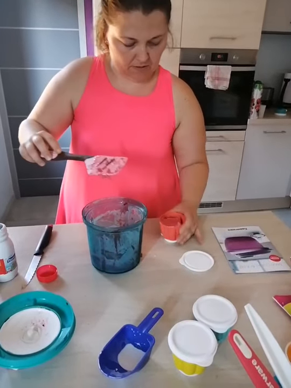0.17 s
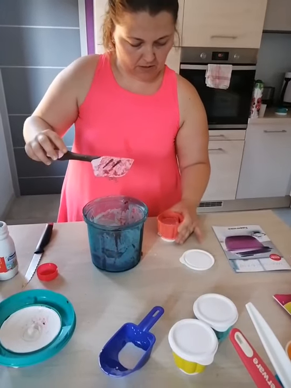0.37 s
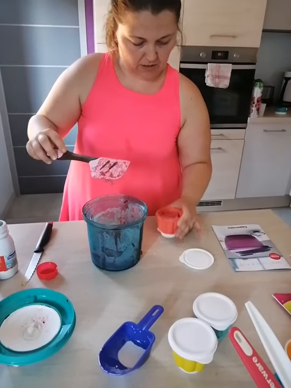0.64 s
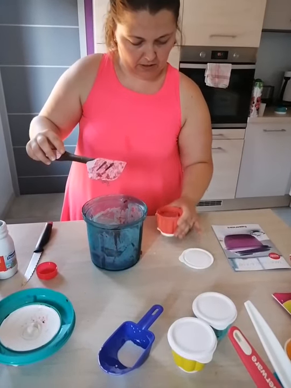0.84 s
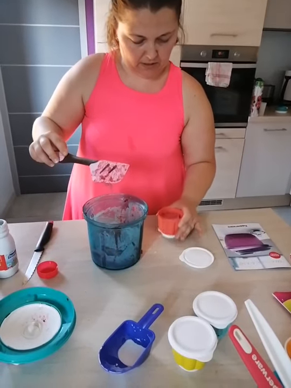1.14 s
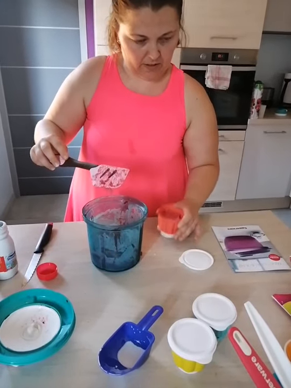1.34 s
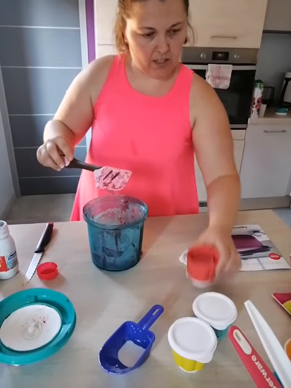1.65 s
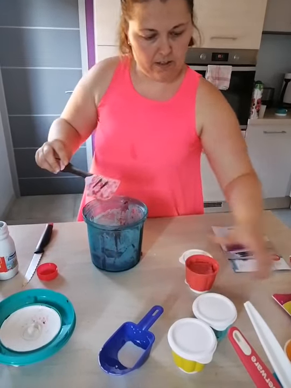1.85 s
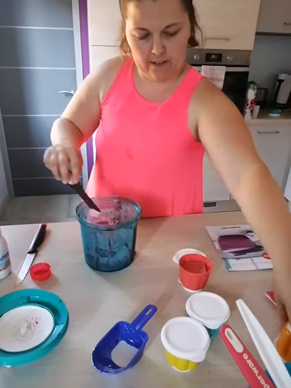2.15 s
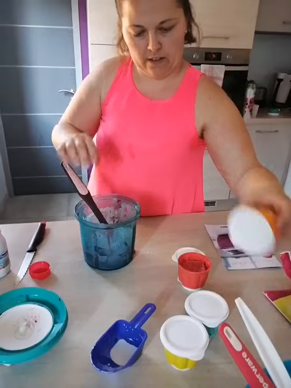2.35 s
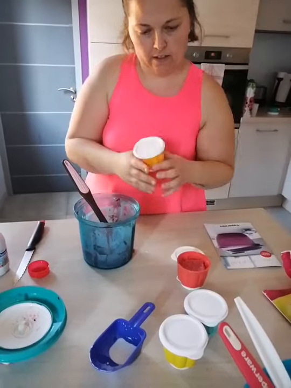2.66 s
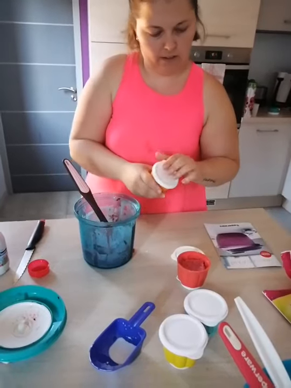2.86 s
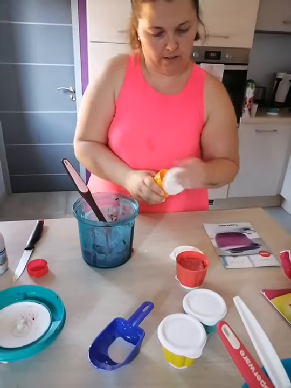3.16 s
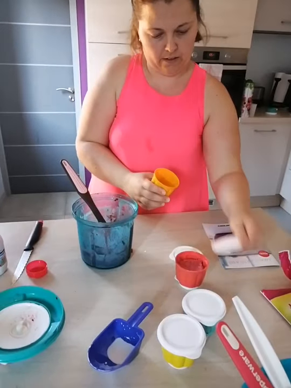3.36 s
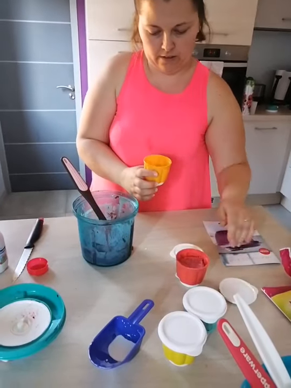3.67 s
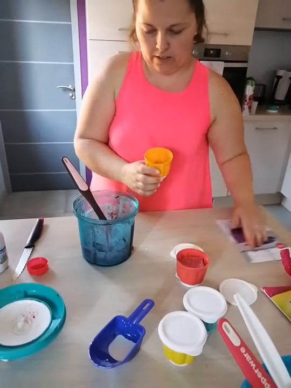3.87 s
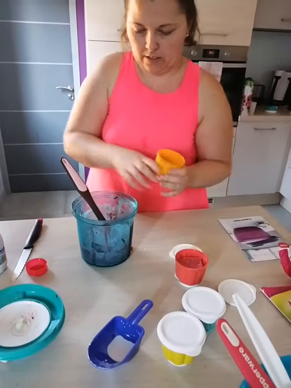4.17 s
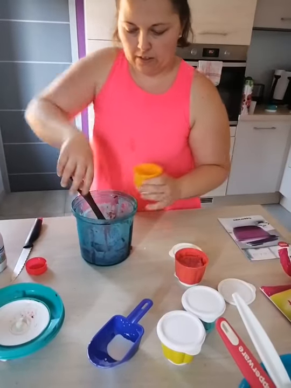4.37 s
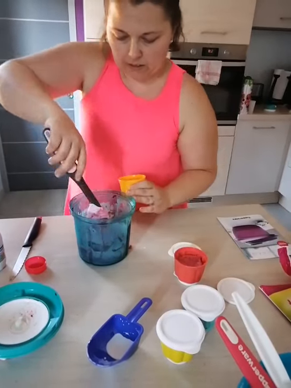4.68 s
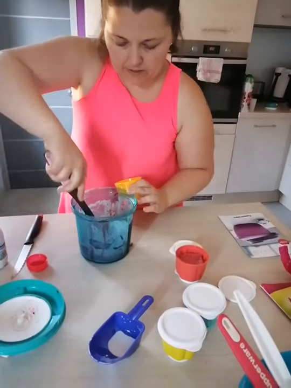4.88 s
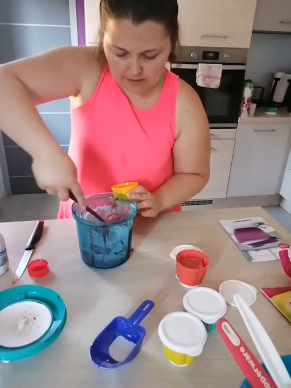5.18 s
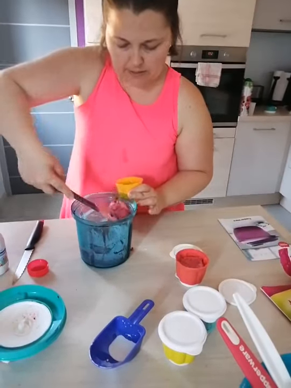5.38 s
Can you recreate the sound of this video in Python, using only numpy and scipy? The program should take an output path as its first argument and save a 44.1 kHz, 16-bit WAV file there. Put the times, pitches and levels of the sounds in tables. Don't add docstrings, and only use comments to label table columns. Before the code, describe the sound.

Seven loud hollow plastic knocks on a kitchen worktop, a soft set-down, spatula clunk, lid pop and clatter, then faint scraping in a jug.

```python
import sys
import numpy as np
from scipy import signal
from scipy.fft import rfft, irfft, next_fast_len
from scipy.io import wavfile
from scipy.ndimage import map_coordinates

SR = 44100
rng = np.random.default_rng(int(sys.argv[2]) if len(sys.argv) > 2 else 0)


def unload_wav(signal):
    wavfile.write(
        sys.argv[1],
        SR,
        np.round(np.clip(np.atleast_2d(signal).T, -1, 1) * 32767).astype(np.int16),
    )


def volts_from_db(level):
    exponent = np.asarray(level, float) / 20
    return 10 ** exponent


N = 243340
SPAN = 2 ** 15

# frequency in Hz, width in Hz, level in dB.
WORKTOP_MODES = [(49.7, 20, -7), (131.9, 9.3, 6), (142.2, 13, 3), (212.7, 13, 4), (253.8, 11, 5),
                 (307.8, 26, 1), (250, 17, -3.5), (352, 24, -3.5), (423.7, 25, -0.5), (543.7, 46, -3)]
# frequency in Hz, width in Hz, level in dB.
JUG_MODES = [(574.4, 74, -1), (1464, 170, -5.5), (1777, 79, -0.5), (2154, 235, -1.5), (2410, 660, -8.5),
             (3220, 680, -18.5), (5400, 2200, -29.5)]
# start in seconds, length in seconds, rasp in dB,
# rumble over rasp in dB, hollow resonance in Hz.
STROKES = [(0.0, 0.29, -74, 4, 2800), (1.565, 0.51, -68, -2, 3170), (2.53, 0.39, -70, 0.5, 3320),
           (2.933, 0.021, -69.5, 13.5, 2830), (2.993, 0.09, -61.5, -9, 2910), (3.113, 0.077, -71, 5, 2800),
           (3.838, 0.066, -67, 5, 8070), (4.135, 0.213, -66, -1, 3320), (4.552, 0.043, -69, 3, 3566),
           (4.807, 0.115, -61, -6, 3400), (4.944, 0.18, -60, 3, 2600), (5.12, 0.06, -62, -5, 3200),
           (5.186, 0.16, -61.5, 0.5, 2470), (5.354, 0.088, -75, -6, 2500)]


def along(points, hz):
    f, v = np.transpose(points)
    return np.interp(np.log(hz + 1), np.log(f + 1), v)


def unit(x):
    return x / np.sqrt(np.mean(x ** 2) + 1e-20)


def filtered(x, response):
    m = next_fast_len(x.shape[-1] + 8192)
    spectrum = rfft(x, m) * response(np.fft.rfftfreq(m, 1 / SR))
    return irfft(spectrum, m)[..., :x.shape[-1]]


def wobble(rate):
    knots = rng.standard_normal(int(N * rate / SR) + 4)
    return map_coordinates(knots, [np.arange(N) * rate / SR])


def hush():
    # frequency in Hz, density in dB per Hz.
    spectrum = [(12, -51.5), (25, 6.5), (52, 7), (90, -2.5), (200, -2.5), (420, -14.5), (493, -2),
                (570, -11.5), (1200, -17.5), (2100, -20.5), (4000, -29), (8000, -37), (12000, -43),
                (15500, -42.5)]
    # time in seconds, level in dB.
    course = [(0, -54.5), (0.222, -57), (1.6, -61.5), (2.8, -62), (3.4, -63), (4.1, -62.5), (4.45, -64),
              (4.8, -60.5), (5.52, -61.5)]
    s, db = np.transpose(course)
    noise = unit(filtered(rng.standard_normal(N), lambda hz: volts_from_db(along(spectrum, hz))))
    return volts_from_db(np.interp(np.arange(N) / SR, s, db) + 1.4 * wobble(6)) * noise


def kitchen():
    # frequency in Hz, time to fall 60 dB in seconds.
    decay = [(60, 0.15), (250, 0.54), (1000, 0.7), (3000, 0.7), (6000, 0.6), (12000, 0.35)]
    hz, t, z = signal.stft(rng.standard_normal(SPAN), SR, nperseg=256)
    fading = z * volts_from_db(-60 * t / along(decay, hz)[:, None])
    tail = signal.istft(fading, SR, nperseg=256)[1][:SPAN]
    tail = tail * np.clip((np.arange(SPAN) / SR - .008) / 0.011, 0, 1)
    tail = filtered(tail, lambda f: (1j * f / (170 + 1j * f)) ** 2)
    return tail / np.linalg.norm(tail)


def ringing(force, modes, gains_db):
    def body(f):
        response = 0
        for k, ((centre, width, db), gain_db) in enumerate(zip(modes, gains_db)):
            damping = 1j * f * width
            response = response + (-1) ** k * volts_from_db(db + gain_db) * damping / (centre ** 2 - f ** 2 + damping)
        return response
    ring = filtered(force, body)
    return ring / np.abs(ring).max()


def singing(rows, waver, rough_db):
    s, hz, db = np.transpose(rows)
    t = np.arange(N) / SR
    turns = np.cumsum(np.interp(t, s, hz) * (1 + waver * wobble(120))) / SR
    level_db = np.interp(t, s, db, -120, -120) + rough_db * wobble(180)
    tone = np.sin(2 * np.pi * turns) * volts_from_db(level_db)
    return tone + volts_from_db(-5) * signal.fftconvolve(tone, kitchen())[:N]


def squeals():
    # start in seconds, length in seconds, first frequency in Hz, last frequency in Hz, level in dB.
    slides = [
        (4.3, 0.09, 5900, 5870, -84),
        (5.04, 0.04, 1510, 1500, -71),
        (5.22, 0.07, 1500, 1495, -67),
        (5.21, 0.19, 2050, 2380, -67.5),
    ]
    swell_s, faint_db = .03, 15
    total = 0
    for s, length, first, last, db in slides:
        end = s + length
        glide = [(s - swell_s, first, db - faint_db), (s, first, db),
                 (end, last, db), (end + swell_s, last, db - faint_db)]
        total = total + singing(glide, waver=.03, rough_db=4.5)
    return total


def strokes():
    bite_s, let_go_s, ease_db_per_s = .012, .015, 25.5
    start, length, rasp_db = np.transpose(STROKES)[:3, :, None]
    since = np.arange(0, N + 32, 32) / SR - start
    bite = np.clip(since / bite_s, 0, 1)
    release = np.clip((length - since) / let_go_s + 1, 0, 1)
    return bite * release * volts_from_db(rasp_db - ease_db_per_s * np.clip(since, 0, 1)), since


def rubbing():
    # frequency in Hz, density in dB per Hz.
    rasp_spectrum = [(530, -53), (900, -18), (1350, -17.5), (1470, -7.5), (1670, -5.5), (2200, -2),
                     (2540, -10.5), (7490, -18.5), (8240, -31.5), (10700, -22.5), (15500, -35.5)]
    pressure, since = strokes()
    start, _, _, rumble_db, hollow_hz = np.transpose(STROKES)
    share = volts_from_db(-42 * np.clip(since, 0, 1))
    grains = rng.standard_normal((3, N)) * volts_from_db(2.8 * wobble(45) + 1.1 * wobble(400))
    hiss = unit(filtered(grains[0], lambda hz: volts_from_db(along(rasp_spectrum, hz))))

    hz, t, z = signal.stft(grains[1], SR, nperseg=512)
    current = np.maximum(np.searchsorted(start, t) - 1, 0)
    detune = (hz[:, None] / hollow_hz[current] - 1) / .13
    hollow = unit(signal.istft(z / (1 + detune ** 2), SR, nperseg=512)[1][:N])

    def full(slow):
        return np.interp(np.arange(N), 32 * np.arange(len(slow)), slow)

    edge = pressure / np.sqrt(1 + share ** 2)
    rasp = full(edge.sum(0)) * hiss + full((edge * share).sum(0)) * hollow
    plate = unit(ringing(grains[2], WORKTOP_MODES, np.zeros(len(WORKTOP_MODES))))
    wall = unit(ringing(grains[2], JUG_MODES[:1], [0]))
    rumble = unit(plate + 0.7 * wall)
    near = rasp + full(volts_from_db(rumble_db) @ pressure) * volts_from_db(3 * wobble(18)) * rumble
    return near + volts_from_db(-8.0) * signal.fftconvolve(near, kitchen())[:N]


def contacts(events, modes, soft_s, rattle, rattle_t60, slap_db, sub_db, deep_db, room_db):
    # frequency in Hz, width in Hz, level in dB.
    click_modes = [(3000, 3300, 3), (6360, 12000, -6)]
    out = np.zeros(N + SPAN)
    t = np.arange(SPAN // 2) / SR
    octaves = np.log2(np.transpose(modes)[0] / 1000)
    place_db = [sub_db, deep_db, deep_db] + [0] * len(WORKTOP_MODES[3:])
    push = -t / soft_s * np.exp(1 - t / soft_s)
    slap = -volts_from_db(slap_db) * np.sin(t / soft_s / 0.99) * np.exp(1 - t / soft_s / 1.7)
    walls = kitchen()
    for s, db, thump_db, click_db, tilt_db in events:
        bounces = rattle * volts_from_db(-60 * t / rattle_t60) * rng.standard_normal(len(t))
        chatter = np.convolve(bounces, push[:64])[:len(t)]
        gains_db = (tilt_db + 5.5) * octaves + 1.8 * rng.standard_normal(len(modes))
        grit_decay = volts_from_db(-60 * t / 0.0055) + 2.2 * volts_from_db(-60 * t / 0.061)
        grit = ringing(rng.standard_normal(len(t)) * grit_decay, click_modes, [0, 0])
        plate_db = place_db + 0.72 * rng.standard_normal(len(WORKTOP_MODES))
        thump = volts_from_db(thump_db + 6) * ringing(push, WORKTOP_MODES, plate_db)

        direct = ringing(push + chatter, modes, gains_db) + volts_from_db(click_db + 7) * grit + thump + slap
        radiated = ringing(push, modes, gains_db) + 0.79 * thump
        click = volts_from_db(click_db + 15.5) * ringing(t == 0, click_modes, [0, 0])
        wet = 0.81 * signal.fftconvolve(radiated, walls)
        wet += signal.fftconvolve(0.39 * radiated + click, kitchen())

        first = round(s * SR)
        out[first:][:SPAN] += volts_from_db(db + 2 + room_db) * wet[:SPAN]
        out[first:][:len(t)] += volts_from_db(db + 0.5) * direct
    return out[:N]


def lid_lifting():
    # time in seconds, frequency in Hz, level in dB.
    gap = [
        (3.145, 280.2, -58.5),
        (3.181, 327, -54),
        (3.189, 400, -38.5),
        (3.203, 638, -53),
        (3.209, 865, -28.5),
        (3.216, 850, -44),
    ]
    return singing(gap, waver=.12, rough_db=4)


def popping():
    # start in seconds, level in dB, thump in dB, click in dB, tilt in dB per octave.
    pops = [
        (3.209, -25.5, -63, -21.5, -18),
        (3.229, -33, -76, -18, 3),
    ]
    # frequency in Hz, width in Hz, level in dB.
    open_cup = [(400, 330, -29), (814, 62, 9.5), (1110, 150, 3), (2110, 470, -9.5), (3580, 105, -3.5)]
    pop = contacts(pops, open_cup, soft_s=0.0001, rattle=0.16, rattle_t60=0.066,
                   slap_db=-27, sub_db=-12.0, deep_db=-4, room_db=1.8)
    return pop + lid_lifting()


def lid_handling():
    # start in seconds, level in dB, thump in dB, click in dB,
    # tilt in dB per octave. First the rim peels off the cup.
    peels = [
        (3.187, -44.5, -6, -21, -18),
        (3.1944, -33, -15, -9.5, -8.5),
        (3.2008, -36.5, -18, -11.5, -4.5),
        (3.2832, -39, -25, -16, -6.5),
    ]
    # start in seconds, then level, thump and click in dB, tilt in dB per octave.
    hits = [
        (3.5708, -46, -34.5, -31.5, 0.5),
        (3.5753, -18, -29, -16, -6),
        (3.6083, -14.5, -28.5, -17.5, 1.5),
    ]
    # start in seconds, then level, thump and click in dB, tilt in dB per octave.
    rocks = [
        (3.6285, -18, -51.5, -45, 0.87),
        (3.662, -26.5, -44, -33, -1),
    ]
    # start in seconds, then level, thump and click in dB, tilt in dB per octave.
    nudges = [
        (3.902, -27, -30, -16, -0.5),
        (3.9295, -29.5, -29.5, -21, -1),
        (3.9457, -30, -28, -28, 0.5),
        (3.9673, -33.5, -20.5, -15.5, -12),
        (3.9851, -41, -23, -21.5, 5),
        (4.1377, -59, -18, -0.5, 2),
        (4.1942, -67.5, -12, -19, 16),
        (4.2415, -50, -27, -16, -6),
        (4.5494, -62.5, -14, -4, -5),
    ]
    # frequency in Hz, width in Hz, level in dB.
    rim = [(1370, 540, -4.5), (2200, 250, 7), (3720, 220, -7), (4950, 240, 1), (7350, 2000, 1.5)]
    # frequency in Hz, width in Hz, level in dB.
    free = [(603, 195, -5), (1095, 91, -3), (1830, 830, -4.5), (2415, 490, -1.5), (3950, 310, -10.5),
            (5360, 570, -18), (6930, 1100, -24)]
    # frequency in Hz, width in Hz, level in dB.
    held = [(1180, 400, -3), (1640, 125, 1.5), (1833, 220, 1.5), (2090, 620, 0), (3650, 310, -6),
            (5540, 640, -14.5)]
    lid = contacts(peels, rim, soft_s=.00004, rattle=0.57, rattle_t60=0.13,
                   slap_db=-26, sub_db=-21, deep_db=-10, room_db=-4.5)
    lid += contacts(hits, free, soft_s=.00004, rattle=0.18, rattle_t60=0.072,
                    slap_db=-7, sub_db=-23, deep_db=5.0, room_db=-1.5)
    lid += contacts(rocks, free, soft_s=.00004, rattle=0.2, rattle_t60=0.079,
                    slap_db=-10, sub_db=-18, deep_db=9.5, room_db=5.5)
    lid += contacts(nudges, held, soft_s=.00005, rattle=0.39, rattle_t60=0.074,
                    slap_db=-10.5, sub_db=-21, deep_db=5, room_db=-2.5)
    return lid


def jug_knocks():
    # start in seconds, then level, thump and click in dB, tilt in dB per octave.
    hits = [
        (2.191, -47.5, 0.5, -19, -6),
        (2.216, -36, 0.5, -39, -0.5),
        (2.241, -41.5, -6.5, -22, -20),
        (2.289, -38.5, -5, -27, 0),
        (2.302, -37.5, -10.5, -40, 3),
        (2.317, -42.5, -43, -22, -6),
    ]
    # start in seconds, then level, thump and click in dB, tilt in dB per octave.
    ticks = [
        (2.94, -51.5, -0.5, -12.5, 2.5),
        (4.899, -59.5, -5.5, 2, 15),
        (5.195, -55, -8, -3, -9),
        (5.443, -45.5, 1, -36, 2),
        (5.458, -49, 5.5, -17, 4),
    ]
    # start in seconds, then level, thump and click in dB, tilt in dB per octave.
    bumps = [
        (2.214, -36, -8.5, -37, 3),
        (4.618, -38.5, 0.5, -45, 6),
        (4.654, -50.5, -0.5, -44, -11),
        (4.699, -49.5, -3.5, -43, -12),
    ]
    # frequency in Hz, width in Hz, level in dB.
    foot = [(153, 170, 0.46), (280, 160, -2)]
    jug = contacts(hits, JUG_MODES, soft_s=.00006, rattle=0.23, rattle_t60=0.14,
                   slap_db=-34, sub_db=8.5, deep_db=4.5, room_db=2.5)
    jug += contacts(ticks, JUG_MODES, soft_s=.00006, rattle=0.12, rattle_t60=0.073,
                    slap_db=-20, sub_db=9.0, deep_db=2.5, room_db=-1)
    jug += contacts(bumps, foot, soft_s=0.00067, rattle=0.27, rattle_t60=0.1,
                    slap_db=0.5, sub_db=0.5, deep_db=-0.5, room_db=-8)
    return jug


def cup_taps():
    # start in seconds, level in dB, thump in dB, click in dB, tilt in dB per octave.
    taps = [
        (0.23, -8, -5.5, -19, -3),
        (0.443, -5, -13, -25.5, -2.5),
        (0.614, -5.5, -13.5, -22, -2.5),
        (0.791, -6.5, -14, -20, -1),
        (0.969, -12, -11, -23.5, -5.5),
        (1.124, -9, -14, -21.5, -4.5),
        (1.279, -12, -11.5, -25, -7),
    ]
    # start in seconds, level in dB, thump in dB, click in dB, tilt in dB per octave.
    set_down = [
        (1.767, -20.5, -4, -24.5, -12),
    ]
    # frequency in Hz, width in Hz, level in dB.
    shell = [(498, 110, -4), (600, 46, -7), (688.3, 49, -0.5), (850, 110, 0.5), (1075, 190, -3.5),
             (1433, 200, -6), (1630, 110, -9), (2135, 500, -11.5), (2760, 250, -19.5), (3660, 470, -20)]
    cup = contacts(taps, shell, soft_s=0.00012, rattle=0.14, rattle_t60=0.048,
                   slap_db=-7.5, sub_db=2.5, deep_db=-2, room_db=-3.0)
    cup += contacts(set_down, shell[:5], soft_s=0.000067, rattle=0.063, rattle_t60=0.057,
                    slap_db=-12, sub_db=-11.5, deep_db=8.5, room_db=-2.0)
    return cup


def scene():
    background = hush()
    friction = rubbing() + squeals()
    blows = popping() + lid_handling() + jug_knocks() + cup_taps()
    return (background + friction + blows)[None]


def low_pass(x):
    return signal.sosfilt(signal.butter(12, 15640, fs=SR, output="sos"), x)


def record(dry):
    # frequency in Hz, gain in dB.
    microphone = [(20, -25.5), (45, -3), (70, -4.5), (8000, -1), (11000, -1), (13000, -9.5), (15500, -26.5)]
    heard = filtered(dry, lambda hz: volts_from_db(along(microphone, hz)))
    return low_pass(heard)


dry = scene()
out = record(dry)
unload_wav(out)
```